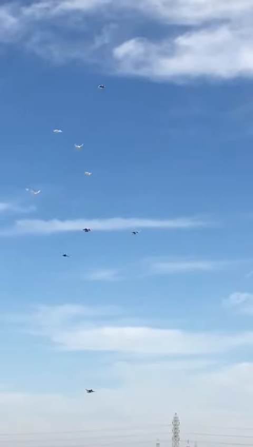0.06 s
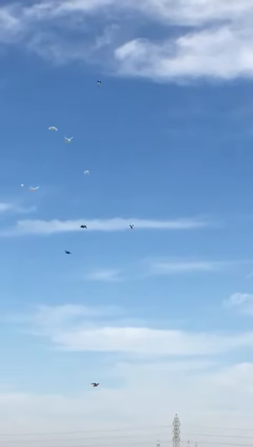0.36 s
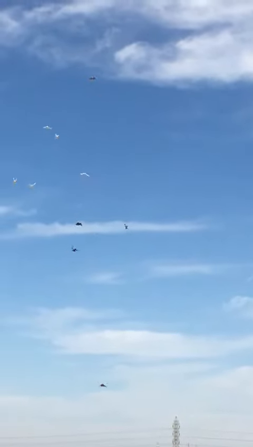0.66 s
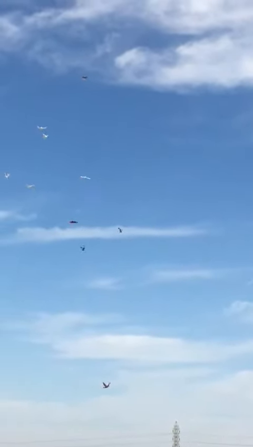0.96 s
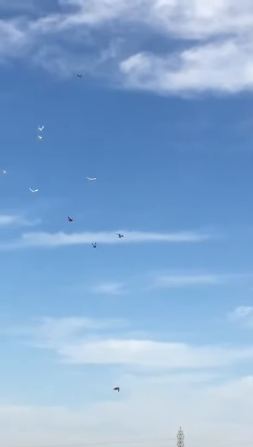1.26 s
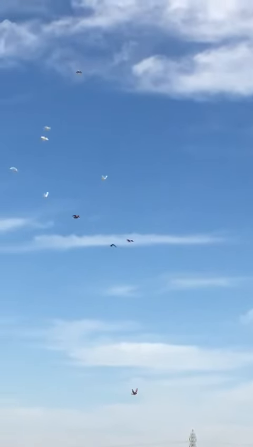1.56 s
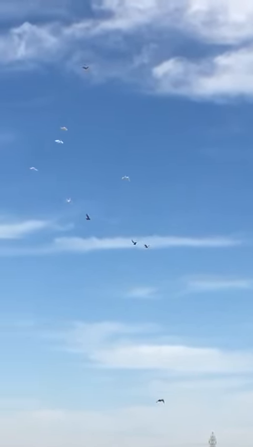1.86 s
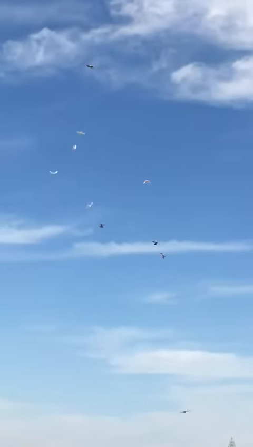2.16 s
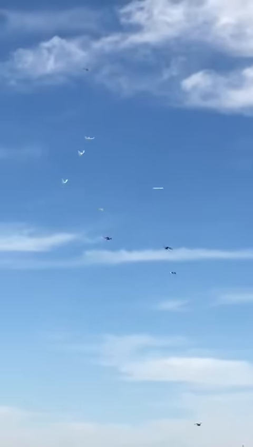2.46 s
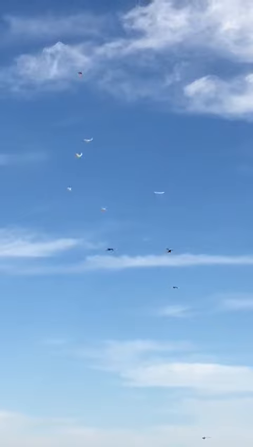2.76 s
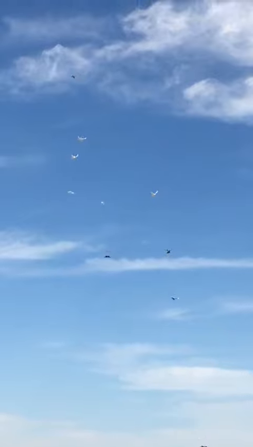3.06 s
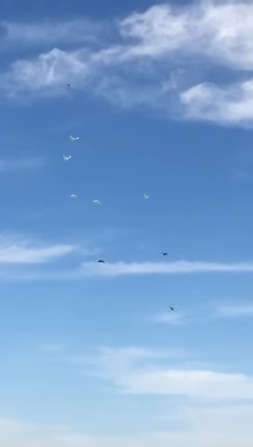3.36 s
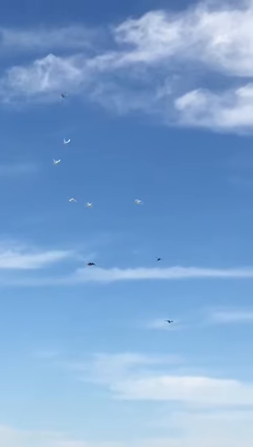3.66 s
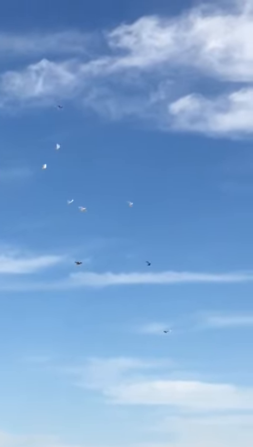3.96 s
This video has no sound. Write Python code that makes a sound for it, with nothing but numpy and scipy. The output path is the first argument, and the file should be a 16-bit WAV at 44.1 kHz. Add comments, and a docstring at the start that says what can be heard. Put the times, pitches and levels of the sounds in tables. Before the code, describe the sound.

Pigeons flap overhead in raspy, rustling wingbeats, about six a second, from the start until around 2 seconds. A stronger run comes from 2.7 to 3.2 seconds, then a few scattered strokes. Small birds chirp further off throughout, with a slight echo. Soft thumps fall near 1, 2 and 2.8 seconds, over light gusty wind rumble, outdoor hiss and a faint distant machine hum.

```python
"""Pigeons circle under an open sky, wings beating in runs of about six strokes a second.
Each stroke is a rasping rustle of air and rubbing feathers; a few feather edges whistle.
Small birds chirp and chatter further off, and buildings throw back a short tail of wings and calls.
Behind them: three soft thumps, gusty wind rumble, a distant machine's hum and open-air hiss."""
import sys
import numpy as np
from scipy import signal
from scipy.fft import rfft, irfft
from scipy.io import wavfile
from scipy.ndimage import uniform_filter1d

SR = 44100
rng = np.random.default_rng(int(sys.argv[2]) if len(sys.argv) > 2 else 0)


def dump(signal):
    """Clip the signal to [-1, 1] and save it as 16-bit WAV at the path in sys.argv[1]."""
    limited = np.clip(np.atleast_2d(signal).T, -1, 1)
    pcm = np.round(limited * 32767).astype(np.int16)
    wavfile.write(sys.argv[1], SR, pcm)


N = 176400
T = np.arange(N) / SR


def wingbeats():
    """Each stroke drives a broad rustle, two resonances and the quills, under a fast rasp."""
    # start_s, attack_s, length_s, level_db, feather_hz, low_band_db
    strokes = [(-.06, .03, 0.066, -45, 6170, 6), (0.081, 0.075, 0.082, -43.5, 5700, 12),
               (0.243, 0.017, 0.089, -47, 5710, 0), (0.344, 0.035, 0.074, -41, 5780, 7),
               (0.421, 0.045, 0.11, -40, 5700, 0.5), (0.602, 0.033, 0.052, -35.5, 5810, -8),
               (0.764, 0.011, 0.065, -39, 6270, -5), (0.904, 0.022, 0.079, -43.5, 5980, -2),
               (1.026, 0.04, 0.091, -41, 5990, -7), (1.101, 0.022, 0.11, -48, 5670, -19),
               (1.28, 0.027, 0.12, -45, 5740, 0), (1.422, 0.1, .11, -43.5, 5490, -3),
               (1.607, 0.053, 0.078, -46, 6320, 2.5), (1.775, 0.015, 0.094, -48, 5910, 0),
               (1.918, 0.056, 0.1, -46, 5810, 3), (2.078, 0.017, 0.053, -54.5, 5020, 4),
               (2.346, 0.056, 0.11, -41.5, 5820, 0), (2.521, 0.022, 0.047, -55.5, 5100, 13),
               (2.696, 0.043, 0.082, -38, 6850, -1), (2.842, 0.039, 0.089, -39.5, 6080, -3),
               (3.002, 0.0084, 0.091, -38.5, 6200, -1), (3.166, 0.023, 0.08, -37.5, 6050, -4),
               (3.455, 0.0083, 0.016, -60, 4600, 5), (3.583, 0.015, .03, -63, 5500, 6),
               (3.632, 0.026, 0.082, -40.5, 5790, -6.5), (3.798, 0.02, 0.044, -49, 5000, 16),
               (3.952, 0.016, 0.032, -59.5, 4860, 8)]
    glide_oct_per_s, width_hz, low_band_hz = -0.583, 1070, 3410
    ragged_hz, rasp_hz, swell_db, release_s = 21, 140, 2.5, 0.025
    out, t = np.zeros(N), T[:SR // 4]
    size = len(t)
    for start_s, attack_s, length_s, level_db, feather_hz, low_band_db in strokes:
        sinking_hz = feather_hz * 2 ** (glide_oct_per_s * (t - length_s / 2))  # the stroke slows
        parts = (rustle(size),
                 from_db(-7) * noise_band(sinking_hz, width_hz),
                 from_db(4 + low_band_db) * resonance(friction(size), low_band_hz, width_hz),
                 from_db(-11) * quills(size))
        # each part of the wing catches the air unevenly
        wing = sum(part * from_db(0.5 * drift(ragged_hz, size)) for part in parts)
        rasping = unit_rms(wing_turn(wing) * from_db(0.5 * drift(rasp_hz, size)))
        arch_db = swell_db * (np.sin(np.pi * np.minimum(t / length_s, 1)) - 1)
        envelope = np.minimum(t / attack_s, 1) * np.exp(-np.maximum(t - length_s, 0) / release_s)
        add(out, start_s, from_db(level_db + arch_db) * envelope * rasping)
    return out


def friction(size, clicks_per_s=2500, click_db=-5.5):
    """Rushing air plus tiny clicks of feather on feather."""
    clicks = (rng.random(size) < clicks_per_s / SR) * rng.standard_normal(size)
    return unit_rms(rng.standard_normal(size) + from_db(click_db) * unit_rms(clicks))


def rustle(size):
    """Broadband feather friction, strongest near 6 kHz."""
    # freq_hz, gain_db
    spectrum = [(500, -36), (1100, -23.5), (1900, -12), (3300, -12), (4700, -20), (6000, 0.5),
                (7700, -13.5), (9000, -7.5), (10300, -21), (12000, -28)]
    return colour(friction(size), spectrum)


def quills(size, centre_hz=5970, spread_oct=0.425, width_hz=140):
    """Seven feather edges, each hissing in its own narrow band."""
    offsets = np.linspace(-1, 1, 7) + rng.uniform(-0.18, 0.16, 7)
    pitches_hz = centre_hz * 2 ** (spread_oct * offsets)
    return sum(resonance(rng.standard_normal(size), hz, width_hz) for hz in pitches_hz)


def wing_turn(x, ripple_db=3.5, step_hz=191.2, fade_s=0.04):
    """Random spectral peaks and dips, crossfading as the wing turns."""
    bins_hz = np.arange(len(x) // 2 + 1) * SR / len(x)
    out = np.zeros(len(x))
    for k, pattern in enumerate(rng.standard_normal((9, 400))):
        gain_db = ripple_db * np.interp(bins_hz / step_hz, np.arange(len(pattern)), pattern)
        crossfade = np.maximum(1 - np.abs(T[:len(x)] / fade_s - k), 0)
        out += irfft(rfft(x) * from_db(gain_db), len(x)) * crossfade
    return out


def feather_whistles():
    """Feather edges sing briefly in a hard stroke."""
    # centre_s, sigma_s, pitch_hz, width_hz, level_db
    tones = [(1.083, 0.015, 6300, 180, -42), (2.757, 0.017, 7950, 62, -41), (2.755, 0.023, 7720, 52, -49)]
    out = np.zeros(N)
    for centre_s, sigma_s, pitch_hz, width_hz, level_db in tones:
        envelope = np.exp(-((T - centre_s) / sigma_s) ** 2 / 2)
        out += from_db(level_db) * envelope * noise_band(np.full(N, pitch_hz), width_hz)
    return out


def birds():
    """Nearer chirps over a far flock; the throats favour the range below 4 kHz."""
    # start_s, length_s, first_hz, middle_hz, last_hz, level_db, roughness
    calls = [(0.154, .028, 3520, 3480, 3420, -55, 0.2), (0.221, 0.072, 1356, 1220, 1150, -57, 0.02),
             (.308, .04, 1286, 1180, 1140, -64, 0.06), (0.257, 0.085, 4800, 4000, 3430, -42.5, 0.66),
             (0.369, 0.053, 3616, 3780, 3590, -46.5, 0.4), (.522, .022, 4240, 4150, 4100, -43, 0.2),
             (.55, .08, 2895, 2550, 2460, -52, 0.29), (0.565, 0.046, 1280, 1210, 1150, -59, 0),
             (0.7, 0.054, 3260, 3240, 3130, -49, 0.3), (0.873, 0.04, 3310, 3600, 3750, -48, 0.48),
             (1.028, 0.079, 3600, 3200, 2635, -46.5, 0.3), (1.099, 0.15, 2750, 2850, 3220, -54, 0.16),
             (1.22, 0.075, 3090, 3896, 3760, -41.5, 0.87), (1.286, 0.16, 3405, 3100, 2685, -48, 0.43),
             (1.456, 0.039, 2144, 2400, 2750, -50.5, 0.47), (1.586, .04, 3410, 3100, 2640, -48, 0.77),
             (1.607, .07, 2670, 2650, 2370, -51.5, 0.73), (2.08, 0.14, 2905, 3400, 3280, -50.5, 0.5),
             (2.087, 0.073, 1780, 1800, 1900, -53.5, 0.1), (2.266, 0.038, 2294, 2400, 2460, -52.5, 0),
             (2.269, 0.023, 4360, 4700, 4570, -51.5, 0.08), (2.313, 0.071, 2897, 3150, 3330, -47, 0.5),
             (2.405, 0.15, 3400, 3350, 3080, -52.5, 0.56), (2.541, 0.06, 3320, 3650, 3860, -52.5, 0.26),
             (2.58, 0.058, 2530, 2820, 2820, -50, 0), (2.66, 0.022, 2670, 2730, 2770, -42.5, 0.02),
             (2.637, 0.058, 2730, 3600, 3970, -41.5, 0.6), (2.705, .03, 3784, 3200, 2530, -41, 0.25),
             (2.749, 0.049, 4060, 3560, 3200, -44.5, 0.42), (2.686, 0.0243, 1574, 1400, 1320, -53, 0.08),
             (2.938, 0.077, 4300, 4350, 4400, -52, 0.1), (3.082, .1, 3200, 3000, 2523, -47, 0.8),
             (3.323, 0.05, 2466, 2850, 2520, -50, 0.11), (3.375, .04, 3244, 3000, 2550, -59, .1),
             (3.464, 0.058, 2602, 2600, 2380, -58, 0.09), (3.661, 0.058, 3230, 3300, 3390, -45.5, 0.36),
             (3.707, 0.049, 1764, 2400, 2640, -50.5, .4), (3.749, 0.045, 3200, 3080, 2650, -45, 0.24),
             (3.841, 0.028, 2120, 2020, 1940, -56, 0), (3.844, 0.06, 2947, 3200, 3590, -47.5, 0.4),
             (3.925, 0.065, 3156, 3380, 3590, -49, 0.14)]
    # freq_hz, gain_db
    throat = [(1000, 3), (4200, -1), (5200, 0), (8000, 1)]
    near = np.zeros(N)
    for start_s, length_s, first_hz, middle_hz, last_hz, level_db, roughness in calls:
        add(near, start_s, from_db(level_db) * chirp(length_s, first_hz, middle_hz, last_hz, roughness))
    return colour(near + far_flock(), throat)


def chirp(length_s, first_hz, middle_hz, last_hz, roughness):
    """A gliding whistle, made hoarse by fast wobble of pitch and level."""
    full_warble_hz, warble_rate_hz, flutter_db, overtone_db = 598, 299, 3, -24
    size = SR // 6
    progress = np.minimum(T[:size] / length_s, 1)
    glide_hz = np.polyval(np.polyfit([0, 0.5, 1], [first_hz, middle_hz, last_hz], 2), progress)
    warble_hz = roughness * full_warble_hz * np.tanh(drift(warble_rate_hz, size))
    phase = 2 * np.pi * np.cumsum(glide_hz + warble_hz) / SR
    voice = np.sin(phase) + from_db(overtone_db) * np.sin(2 * phase)
    flutter = from_db(flutter_db * drift(warble_rate_hz / 2, size))
    return unit_rms(voice * flutter) * np.abs(np.sin(np.pi * progress)) ** 0.34


def far_flock(count=210, centre_hz=2555, spread_oct=0.28, length_s=0.0278, base_db=-58):
    """Faint chatter: short chirps at random times and pitches."""
    # time_s, gain_db
    liveliness = [(0, 4), (.5, 2.5), (1.5, -4.5), (2.3, 1), (3.1, 3.5), (3.35, -2), (3.58, -1.5), (3.75, 4)]
    starts_s = rng.uniform(0, N / SR, count)
    deviations = np.clip(rng.standard_normal((count, 4)), -2, 2)
    out = np.zeros(N)
    for start_s, (pitch, first, last, strength) in zip(starts_s, deviations):
        hz = centre_hz * 2 ** (spread_oct * pitch)
        level_db = base_db + np.interp(start_s, *np.transpose(liveliness)) + 2 * strength
        call = chirp(length_s, hz * (1 + 0.094 * first), hz, hz * (1 + 0.11 * last), roughness=0.15)
        add(out, start_s, from_db(level_db) * call)
    return out


def echoes(x, t60_s=0.27, onset_s=0.0037, cutoff_hz=6000):
    """A dull, diffuse tail from walls and roofs."""
    t = T[:SR // 2]
    tail = rng.standard_normal(len(t)) * from_db(-60 * t / t60_s) * np.minimum(t / onset_s, 1)
    tail /= np.sqrt(np.sum(tail ** 2))
    dull_tail = signal.sosfilt(signal.butter(1, cutoff_hz, fs=SR, output="sos"), tail)
    return signal.fftconvolve(x, dull_tail)[:N]


def thumps(attack_s=0.0078):
    """Dull puffs of low and mid-range noise."""
    # start_s, pitch_hz, width_hz, level_db, decay_s
    puffs = [(1.019, 110, 30, -31.5, 0.014), (2.005, 824, 700, -50.5, 0.029), (2.838, 594, 595, -52, 0.044)]
    out, t = np.zeros(N), T[:SR // 4]
    attack = np.sin(np.pi / 2 * np.minimum(t / attack_s, 1)) ** 2
    for start_s, pitch_hz, width_hz, level_db, decay_s in puffs:
        puff = unit_rms(resonance(rng.standard_normal(SR), pitch_hz, width_hz))[-len(t):]
        add(out, start_s, from_db(level_db) * puff * attack * np.exp(-(t / decay_s) ** 2))
    return out


def wind(flow_db=-45, rumble_db=-46, split_hz=140, window_s=0.12, gust_depth=0.66):
    """Low wind noise: steady above the split, rumbling with the gusts below it."""
    # freq_hz, gain_db
    spectrum = [(20, -59), (32, -10.5), (50, -1), (75, 1), (110, -3.5), (150, -8.5), (205, -11),
                (270, -17.5), (400, -24), (700, -61)]
    # time_s, strength_db
    gusts = [(0.0, -31), (.15, -40), (0.38, -55), (0.46, -33.5), (.95, -41), (1.3, -57), (1.41, -38.5),
             (1.97, -37), (2.31, -51), (2.39, -30), (2.66, -55), (2.77, -38.5), (2.86, -51), (2.96, -31.5),
             (3.11, -44), (3.21, -32), (3.36, -56.5), (3.64, -55), (3.73, -37.5), (4.0, -36)]
    flow = from_db(flow_db) * unit_rms(colour(rng.standard_normal(N), spectrum))
    low = signal.sosfiltfilt(signal.butter(2, split_hz, fs=SR, output="sos"), flow)
    levelled = low / np.sqrt(uniform_filter1d(low ** 2, int(window_s * SR)) + 1e-12)
    gust_gain = from_db(gust_depth * np.interp(T, *np.transpose(gusts)))
    rumble = from_db(rumble_db) * unit_rms(levelled * gust_gain)
    return flow - low + rumble


def machine_hum(hum_hz=78.65, hum_db=-57.5, waver_rad=0.31, waver_hz=2.6, drone_hz=198.9):
    """A distant machine: a wavering low tone with a narrow noise drone above it."""
    # time_s, level_db
    drone_levels = [(0, -60.5), (2.65, -54), (4, -58)]
    phase = 2 * np.pi * hum_hz * T + waver_rad * drift(waver_hz, N)
    hum = from_db(hum_db) * unit_rms(np.sin(phase))
    drone_gain = from_db(np.interp(T, *np.transpose(drone_levels)))
    return hum + drone_gain * noise_band(np.full(N, drone_hz), width_hz=28)


def open_air(level_db=-56):
    """Even outdoor hiss."""
    # freq_hz, gain_db
    spectrum = [(300, 1.5), (450, -5.5), (650, -3), (1000, -10.5), (1600, -5), (2600, -6.5), (3600, -10),
                (5000, -22), (8000, -25), (12000, -35)]
    return from_db(level_db) * unit_rms(colour(rng.standard_normal(N), spectrum))


def from_db(db):
    """Decibels to gain."""
    return 10 ** (np.asarray(db) / 20)


def unit_rms(x):
    """Scale to rms 1."""
    return x / np.sqrt(np.mean(x ** 2) + 1e-20)


def colour(x, spectrum):
    """Filter by (freq_hz, gain_db) points."""
    freq_hz, gain_db = np.transpose(spectrum)
    bins_hz = np.maximum(np.arange(len(x) // 2 + 1) * SR / len(x), 1)
    gain = from_db(np.interp(np.log(bins_hz), np.log(freq_hz), gain_db))
    return irfft(rfft(x) * gain, len(x))


def drift(rate_hz, size):
    """Low-passed noise, rms about 1."""
    pole = np.exp(-2 * np.pi * rate_hz / SR)
    noise = rng.standard_normal(size + SR // 10)
    return unit_rms(signal.lfilter([1], [1, -2 * pole, pole * pole], noise))[-size:]


def resonance(x, centre_hz, width_hz):
    """Band-pass applied twice for steep skirts; peak gain 1."""
    radius = np.exp(-2 * np.pi * width_hz / SR)
    b = np.array([1, 0, -1]) * (1 - radius ** 2) / 2
    a = [1, -2 * radius * np.cos(2 * np.pi * centre_hz / SR), radius ** 2]
    return signal.lfilter(b, a, signal.lfilter(b, a, x))


def noise_band(centre_hz, width_hz):
    """Noise around a pitch curve, rms about 1."""
    phase = 2 * np.pi * np.cumsum(centre_hz) / SR
    return drift(width_hz, len(phase)) * np.cos(phase) + drift(width_hz, len(phase)) * np.sin(phase)


def add(out, start_s, x):
    """Mix x into out from start_s."""
    i = int(start_s * SR)
    lo, hi = max(i, 0), min(i + len(x), N)
    if hi > lo:
        out[lo:hi] += x[lo - i:hi - i]


def scene():
    """Wings and birds with their echoes, over the background; mono."""
    wings = wingbeats() + feather_whistles()
    calls = birds()
    direct = wings + from_db(-2) * calls  # distance weakens the calls
    reflected = from_db(-5) * echoes(wings) + from_db(-3) * echoes(calls)
    return (direct + reflected + thumps() + wind() + machine_hum() + open_air())[None]


def record(dry):
    """Steep low-pass."""
    cutoff_hz = 12000
    return signal.sosfilt(signal.ellip(10, 0.2, 70, cutoff_hz, fs=SR, output="sos"), dry)


dry = scene()
out = record(dry)
dump(out)
```